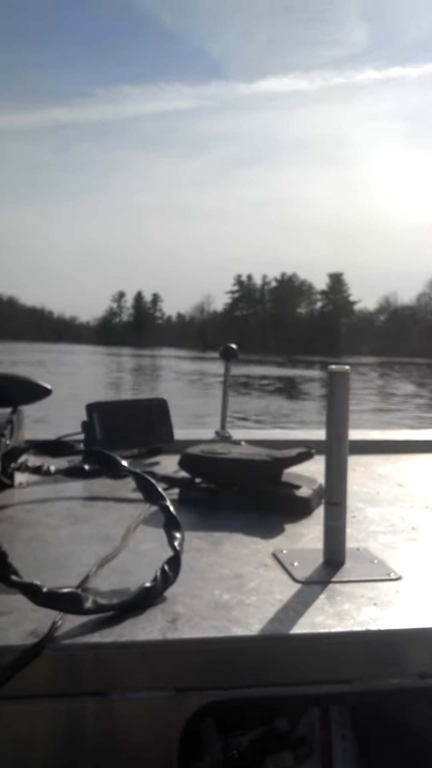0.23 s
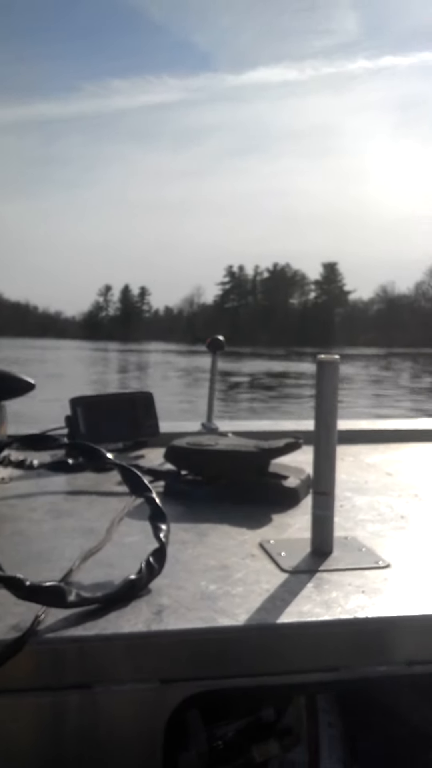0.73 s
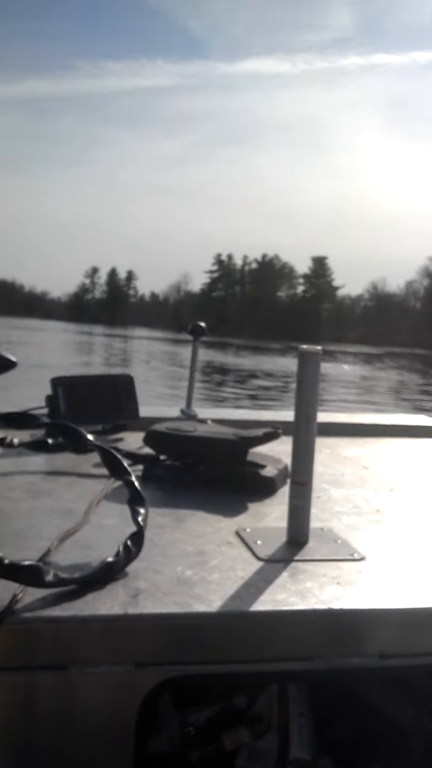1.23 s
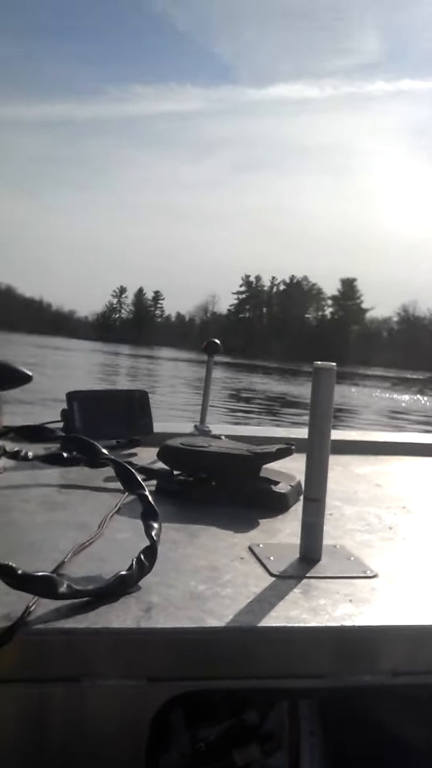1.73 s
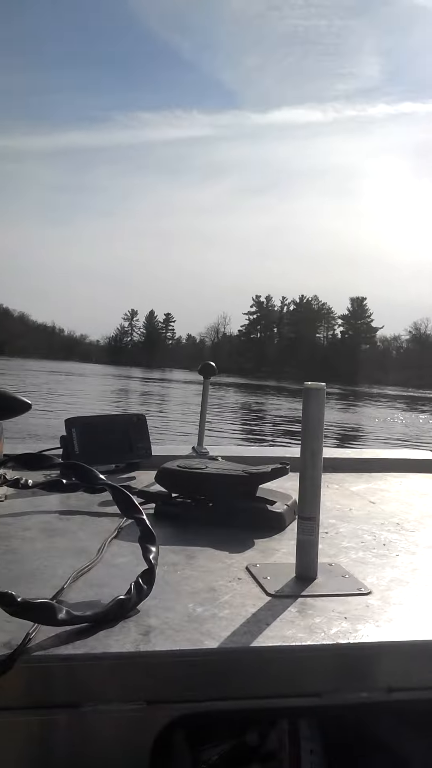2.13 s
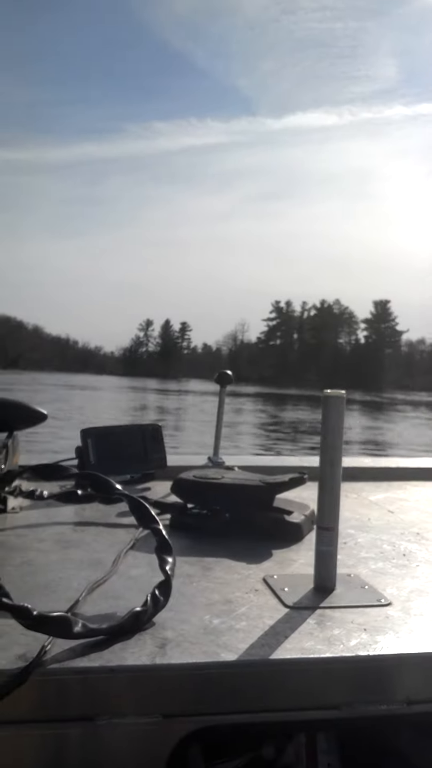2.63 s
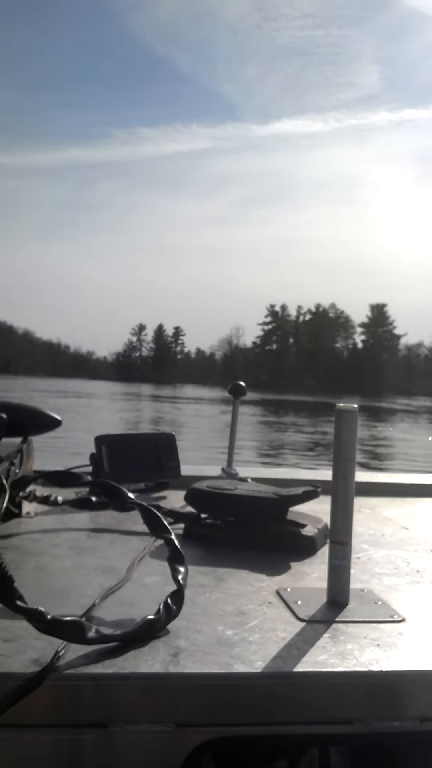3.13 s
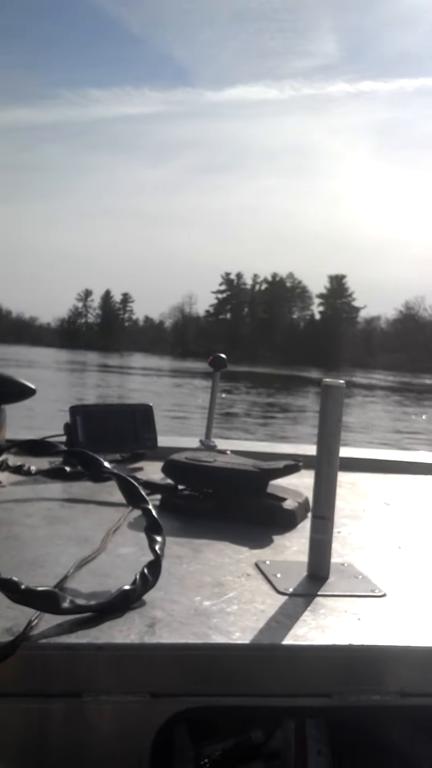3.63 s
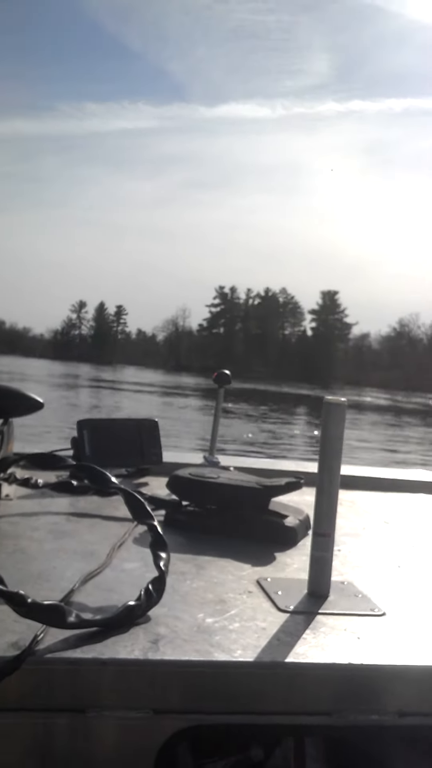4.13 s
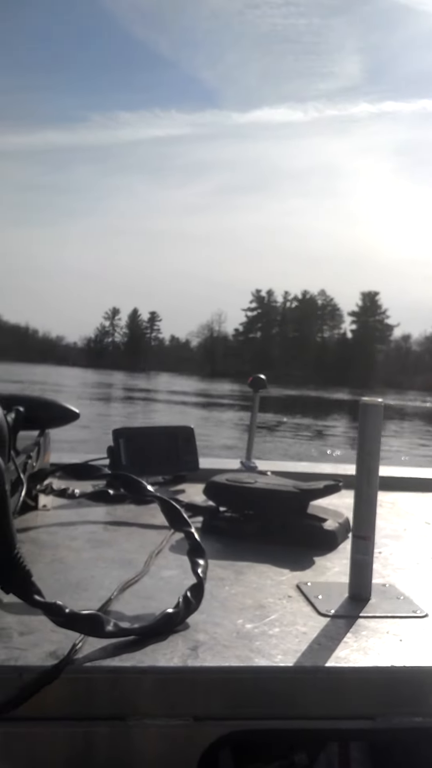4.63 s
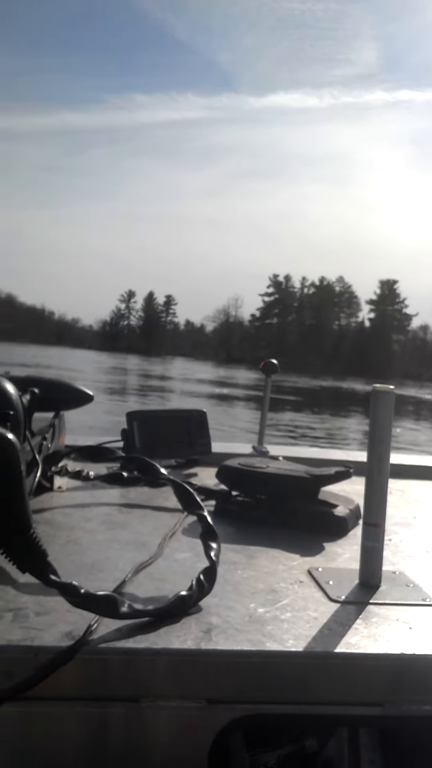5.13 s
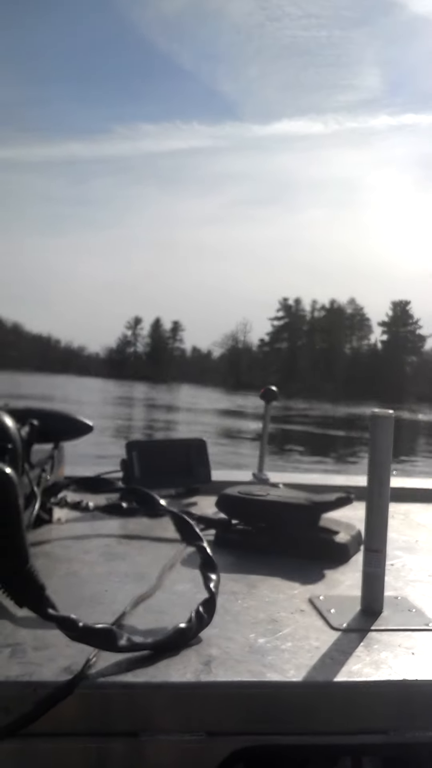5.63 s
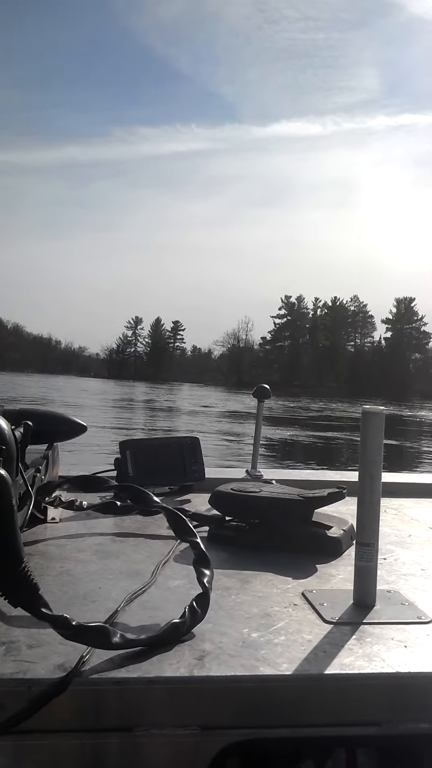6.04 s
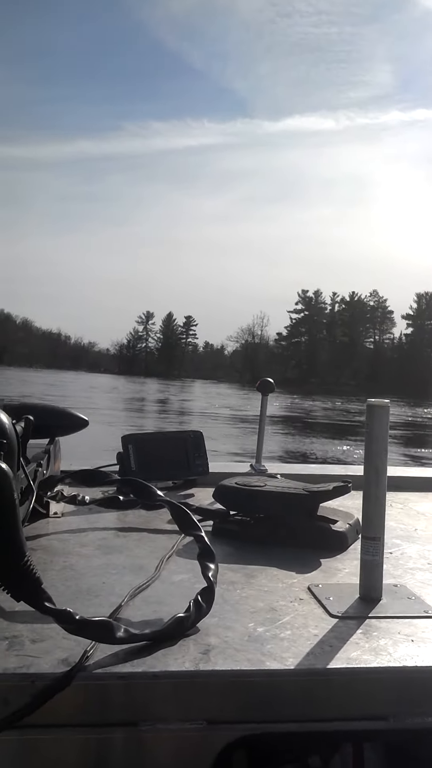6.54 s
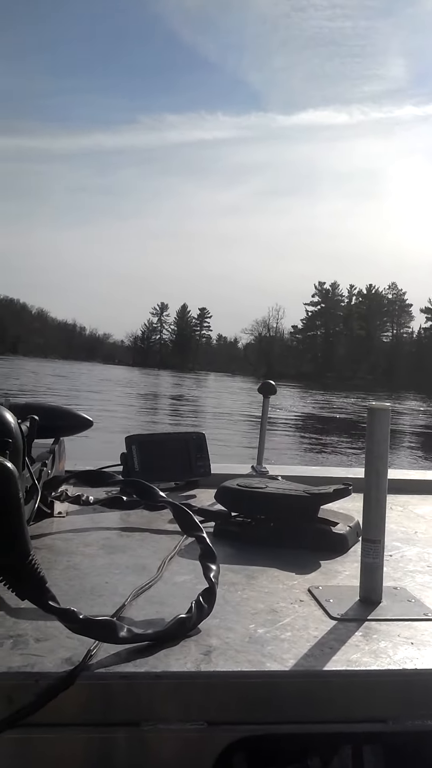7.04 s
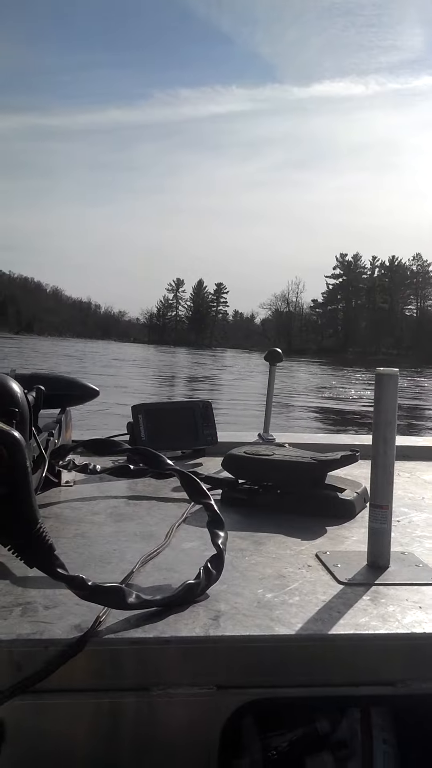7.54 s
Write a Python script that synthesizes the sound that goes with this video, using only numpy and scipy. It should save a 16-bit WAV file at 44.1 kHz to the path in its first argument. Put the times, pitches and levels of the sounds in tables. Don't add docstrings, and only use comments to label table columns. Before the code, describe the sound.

A continuous engine drone, low and metallic, fills the close stereo sound of a hand-held phone on a moving boat. Wind rumbles and flaps irregularly over it, bursting into blunt pops that briefly push the level down. Grainy water spray hisses behind. The motor revs up slightly before three seconds, growing more resonant, then stays nearly steady to the end. Outdoors, no echo.

```python
import sys
import numpy as np
from scipy import signal
from scipy.fft import rfft, irfft, next_fast_len
from scipy.io import wavfile
from scipy.ndimage import uniform_filter1d, minimum_filter1d, map_coordinates

SR = 44100
rng = np.random.default_rng(int(sys.argv[2]) if len(sys.argv) > 2 else 0)


def digitize_waveform(pressure):
    field = np.atleast_2d(pressure).T
    bounded = np.clip(field, -1, 1)
    quanta = np.round(bounded * 32767).astype(np.int16)
    wavfile.write(sys.argv[1], SR, quanta)


def invert_db(x):
    u = np.asarray(x, float) / 20
    return 10 ** u


N = 343098
CONTROL = 147

# t/s, rotation f/Hz
SHAFT_SPEED = [(0.0, 76.47), (0.3, 76.62), (0.55, 76.98), (0.9, 77.04), (1.4, 77.14), (1.75, 77.41),
               (2.2, 78.58), (2.52, 79.03), (2.77, 80.9), (3.05, 81.88), (3.27, 82.48), (3.8, 82.7),
               (4.35, 83.58), (4.75, 83.97), (5.0, 83.89), (5.6, 83.43), (6.15, 83.16), (7.78, 83.13)]


def unit(x):
    return x / np.sqrt(np.mean(x ** 2, axis=-1, keepdims=True) + 1e-20)


def even(x, seconds):
    power = abs(uniform_filter1d(x ** 2, int(seconds * SR), axis=-1))
    return x / np.sqrt(power + 1e-20)


def curves(rows):
    s, *cols = np.transpose(rows)
    t = np.arange(N) / SR
    return np.array([np.interp(t, s, c) for c in cols])


def wobble(rate, count=1, step=1):
    knots = rng.standard_normal((count, int(N * 400 / SR) + 4))
    position = np.arange(0, N, step) * rate / SR
    return np.array([map_coordinates(k, [position]) for k in knots])


def coloured(x, points, column=1):
    m = next_fast_len(N + 8192)
    table = np.transpose(points)
    log_hz = np.log(np.fft.rfftfreq(m, 1 / SR) + 1)
    db = np.interp(log_hz, np.log(table[0]), table[column])
    return irfft(rfft(x, m) * invert_db(db), m)[..., :N]


def delayed(x, count):
    return np.pad(x, (count, 0))[:N]


def spray():
    # f/Hz, density at port A/dB, density at port B/dB
    spray_spectrum = [(500, -37, -31), (1020, 10.5, 9), (1600, 4, -8), (2240, 7.5, 0.5), (3670, 0, -27.5),
                      (4660, -2, -4), (5980, -1, -24), (7600, -13, -3.5), (9640, -23.5, -19.5),
                      (10400, -46, -37), (13000, -22, -19), (16000, -18, -29.5)]
    mist_hz, mist_fades_db = 8800, 1.13
    swell_db = .5 * wobble(9) + .7 * wobble(20, count=2) + .9 * wobble(150, count=2)
    hiss = invert_db(swell_db) * rng.standard_normal((2, N))
    pair = np.array([coloured(hiss[0], spray_spectrum, column=1),
                     coloured(hiss[1], spray_spectrum, column=2)])
    mist = coloured(pair, [(mist_hz * .9, -60), (mist_hz, 0)])
    speed = curves(SHAFT_SPEED)[0]
    pair = pair + mist * (invert_db(mist_fades_db * (speed.mean() - speed)) - 1)
    return invert_db(-43.5) * pair / np.std(pair[0])


def wind():
    # t/s, gust level/dB, excess at port B over port A/dB
    gusts = [(0, 0, 1), (.6, -4, -5), (1.15, 0.5, 2.5), (1.55, -2.5, -2), (1.85, -1, 0), (2.4, 0.5, -2),
             (2.75, -0.5, 6), (3.2, -2, 7.5), (3.65, -1.5, 0), (4.15, -0.5, 5), (4.8, -2.5, -18),
             (5.1, 0.5, -4.5), (5.65, -1, 8), (6.2, -1.5, -1), (6.7, -1, -6.5), (7.0, 3.5, 2),
             (7.3, -0.5, 3), (7.7, -1, 8)]
    # f/Hz, density/dB
    rumble_spectrum = [(20, -45), (40, 4), (60, -6), (90, 4.5), (130, 10), (200, 1), (300, -9),
                       (500, -52.5)]
    # f/Hz, density/dB
    flutter_spectrum = [(100, -20), (200, 5.5), (300, 1), (450, -3.5), (700, -17), (1000, -19), (1700, -29),
                        (3000, -50), (6000, -88)]
    rumble_mean, rumble_swing, rumble_lull = -27.5, 0.68, 2.35
    flutter_mean, flutter_swing, flutter_lull = -24, 1.26, 2.13
    gust_db, lean_db = curves(gusts)
    lumps, eddies, lulls = wobble(28, count=2), wobble(120, count=2), wobble(7, count=3)
    rumble = coloured(invert_db(2.5 * lumps) * rng.standard_normal((2, N)), rumble_spectrum)
    burstiness_db = 2.65 * lumps + 3.25 * eddies
    flutter = coloured(invert_db(burstiness_db) * rng.standard_normal((2, N)), flutter_spectrum)
    rumble, flutter = even(rumble, .15), even(flutter, .15)
    rumble_db = rumble_mean + rumble_swing * gust_db + rumble_lull * lulls[0]
    flutter_db = flutter_mean + flutter_swing * gust_db + flutter_lull * lulls[1:]
    flutter_db = flutter_db + np.outer([-.5, .5], lean_db)
    return invert_db(rumble_db + 5.5) * rumble + invert_db(flutter_db - 1.0) * flutter


def pops():
    # t/s, share on port B (0-1), push level/dB, push f/Hz
    puffs = [(0.872, .1, -24, 200), (1.376, 0.7, -13.5, 500), (1.637, .1, -9, 446), (1.79, 1, -11, 453),
             (1.815, 0.95, -3, 352), (2.095, .1, -12, 500), (2.835, 0.8, -9.5, 550),
             (2.929, 0.2, -9.5, 395), (3.345, .1, -16, 450), (3.637, .9, 2, 216), (3.671, .1, -15.5, 400),
             (4.258, 0, -11, 450), (4.297, 0, -16, 400), (4.77, 0.2, 0, 230), (5.045, 0.2, -27, 400),
             (5.093, .9, -13, 400), (5.368, 0.2, -21, 400), (5.472, 0, -7, 150), (5.62, 0.2, -7.5, 347),
             (5.705, 0, -4.5, 393), (5.722, .9, -7, 248), (6.242, 0.2, -10.5, 350), (6.384, 0.2, -11, 500),
             (6.541, .1, -11, 500), (6.66, .1, -15, 308), (6.887, .1, -7.5, 550), (7.02, 0, -6, 403),
             (7.111, 0.13, -19, 400), (7.525, .1, -7.5, 300), (7.672, .1, -4.5, 440)]
    # t/s, share on port B (0-1), push level/dB, crack level/dB, crack f/Hz
    drops = [
        (2.414, 1, -5, -32, 1730),
        (5.541, 0, -21.5, -28.5, 1150),
        (5.965, 0, -8.5, -26, 1320),
        (6.143, 0.05, -14, -29, 1410),
    ]
    # f/Hz, density/dB
    wake_spectrum = [(150, -19), (350, 5), (900, -5.5), (1600, -15.5), (2600, -25.5), (4000, -49)]
    wake_db, wake_s = -23, 0.01
    crack_at_0_db, crack_grows, puff_crack_hz = -35.5, 0.54, 1150
    drop_push_hz = 443
    half = SR // 50
    out, t = np.zeros((2, N + SR)), np.arange(-SR // 50, half) / SR
    bursts = [(s, share, db, hz, crack_at_0_db + crack_grows * db, puff_crack_hz)
              for s, share, db, hz in puffs]
    bursts += [(s, share, db, drop_push_hz, crack_db, crack_hz) for s, share, db, crack_db, crack_hz in drops]
    cracks = rng.standard_normal((len(bursts), len(t)))
    wakes = unit(coloured(rng.standard_normal(N), wake_spectrum))
    wakes = wakes[:cracks.size].reshape(cracks.shape)
    for (s, share, push_db, push_hz, crack_db, crack_hz), noise, wake in zip(bursts, cracks, wakes):
        push = -invert_db(push_db) * np.exp(-(t * push_hz * 2.0) ** 2) * np.cos(2 * np.pi * push_hz * t)
        dull = signal.butter(3, [400, crack_hz * 1.25], "bandpass", fs=SR, output="sos")
        sweep = np.sin(2 * np.pi * crack_hz * t * (.85 + t / .008))
        snap = sweep + .6 * unit(signal.sosfilt(dull, noise))
        crack = invert_db(crack_db - 2.5) * unit(snap * np.exp(-(t / .0025) ** 2))
        push = push + invert_db(push_db + wake_db) * wake * np.exp(-(t / wake_s) ** 2)
        ports = np.clip([[1 - share], [share]], 0, 1)
        out[:, round(s * SR) - half:][:, :len(t)] += ports * (push + crack)
    return out[:, :N]


def booming(hz):
    # f/Hz, width/Hz, peak level/dB, level away from it/dB, dB per dB of load
    panels = [
        (170, 11.5, -27.5, -29.5, 0.34),
        (251.7, 2.03, -28.5, -38.5, 0.94),
        (406.5, 12.7, -28.5, -39.5, 1.22),
        (923, 18, -39, -64.5, 0.14),
    ]
    # t/s, load/dB
    load = [(0, 2), (.5, -1.5), (1.3, 1), (2.5, 1), (2.8, 3), (3.5, 6.5), (4.25, 5.5), (4.35, 3.5),
            (4.75, 4), (4.9, 1), (5.5, 1), (5.8, 0.5), (6.4, -1), (7.0, 3), (7.2, -3), (7.78, 0.5)]
    centre, width, peak_db, off_db, bite = np.transpose(panels)[:, :, None]
    power = invert_db(2 * peak_db) / (1 + ((hz - centre) * 2 / width) ** 2) + invert_db(2 * off_db)
    load_db = curves(load)[:, ::CONTROL]
    sway_db = -0.02 * wobble(2.548, count=len(panels), step=CONTROL)
    return np.sqrt(power) * invert_db(bite * load_db + sway_db)


def engine():
    # f/Hz, width/Hz, level/dB
    hull = [(90, 30, -47), (315, 13.7, -31.5), (481.3, 12, -35.5), (625, 19.3, -38.5), (786, 33, -44.5),
            (926, 43, -44.5), (1089, 27, -47.5), (1168, 10, -44.5), (1239, 7.7, -45), (1358, 68, -51),
            (1490, 41, -56.5), (1726, 13, -56.5), (1922, 36, -63.5), (2130, 71, -59.5)]
    # f/Hz, density/dB
    exhaust = [(60, -40), (200, 0), (450, -1.5), (700, -6.5), (1000, -14.5), (1700, -19), (2300, -27),
               (4000, -28), (8000, -51)]
    boomers = [1, 2, 4, 10]
    speed = curves(SHAFT_SPEED)[0] + 0.04 * wobble(6)[0]
    turns = np.cumsum(speed) / SR
    orders = np.arange(1, 28)[:, None]
    hz = orders * speed[::CONTROL]
    power = sum(invert_db(2 * db) / (1 + ((hz - c) * 2 / w) ** 2) for c, w, db in hull)
    size = np.sqrt(power) * invert_db(1.1 * wobble(4, count=len(orders), step=CONTROL))
    size[21] *= invert_db(9.5)
    size[boomers] = booming(hz[boomers])
    size[4] *= invert_db(np.interp(hz[4], [397, 404, 404.6], [0, -7, 1]))
    size *= invert_db(1.2 * wobble(25, count=len(orders), step=CONTROL))
    size = np.repeat(size, CONTROL, axis=1)[:, :N]
    start = rng.random((len(orders), 1))
    tones = np.sqrt(2) * np.sum(size * np.sin(2 * np.pi * (orders * turns + start)), axis=0)
    firing = 1 + .12 * np.sin(2 * np.pi * turns)
    roar = unit(coloured(firing * rng.standard_normal(N), exhaust))
    near = tones + invert_db(-34.5 + 1.7 * wobble(9)[0]) * roar
    far = delayed(coloured(near, [(300, -0.5), (900, -3.5), (2500, -17.5)]), count=8)
    return np.array([far, near])


def scene():
    return engine() + wind() + spray() + pops()


def riding():
    # t/s, gain just after/dB
    ducks = [(0, -3), (.871, 0.5), (1.03, 2), (1.15, -1.5), (1.816, -3.5), (2.2, -2.5), (2.413, -3),
             (2.93, -1.2), (3.03, -1), (3.349, -1.55), (3.633, -3.5), (3.8, -1.5), (4.05, -0.5), (4.27, -1),
             (4.45, 0.5), (4.6, -0.7), (4.771, -5), (5.1, -2), (5.55, 1.4), (5.723, -2), (6.242, 1),
             (6.4, 0.1), (6.669, -3.5), (7.05, -1.2), (7.472, -0.8), (7.53, -2.5)]
    ceiling_db, recover_s, duck_s = 9.5, 0.97, 0.0074
    t = np.arange(N) / SR
    s, after_db = np.transpose(ducks)
    last = np.clip(np.searchsorted(s, t, side="right") - 1, 0, None)
    gain_db = ceiling_db + (after_db[last] - ceiling_db) * np.exp(-(t - s[last]) / recover_s)
    return invert_db(uniform_filter1d(gain_db, int(duck_s * SR) + 1, mode="nearest"))


def limited(x, top):
    need = np.minimum(1, top / (abs(x).max(axis=0) + 1e-9))
    return x * uniform_filter1d(minimum_filter1d(need, size=441), size=441)


def starved(sides):
    band_starts = [*range(0, 40, 4), *range(40, 96, 8),
                   96, 108, 120, 132, 144, 160, 176, 196, 216, 240, 264, 292, *range(320, 1025, 32)]
    # f/Hz, level/dB
    threshold = [(700, -60), (1100, -17), (2800, -16), (4100, -12), (7000, -9), (8400, -3), (9500, -.5),
                 (16000, -.5)]
    top_hz = 15770
    hz, _, z = signal.stft([sides[0] + sides[1], sides[0] - sides[1]], SR, nperseg=2048)
    power = abs(z) ** 2
    widths = np.diff([*band_starts, len(hz)])
    band = np.add.reduceat(power, band_starts, axis=1) / widths[:, None]
    band = np.repeat(band, widths, axis=1)
    limit = invert_db(2 * np.interp(hz, *np.transpose(threshold)))[:, None]
    local = uniform_filter1d(power, size=3, axis=1)
    other = band[::-1]
    keep = (local >= limit * other) | (band > other)
    kept = z * keep * (hz < top_hz)[:, None]
    mid, side = signal.istft(kept, SR, nperseg=2048)[1][:, :N] / 2
    return np.array([mid + side, mid - side])


def band_limit(x):
    return signal.sosfilt(signal.butter(12, 17080, fs=SR, output="sos"), x)


def record(dry):
    port_delay = 16
    bass_cut = signal.butter(2, 60, "highpass", fs=SR, output="sos")
    a, b = signal.sosfilt(bass_cut, dry) * riding()
    sides = np.array([a - delayed(b, count=port_delay), b - delayed(a, count=port_delay)])
    mix = starved(limited(sides, top=.93))
    return band_limit(mix)


dry = scene()
out = record(dry)
digitize_waveform(out)
```